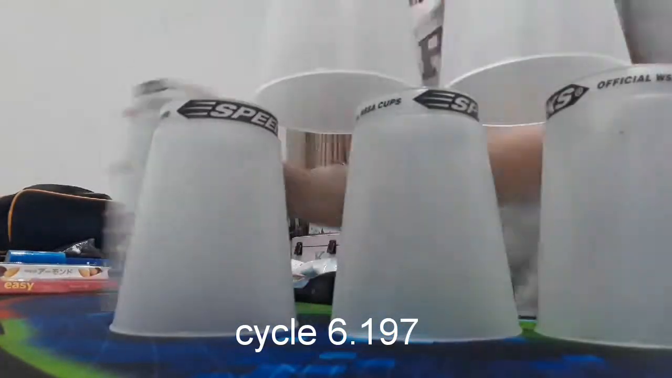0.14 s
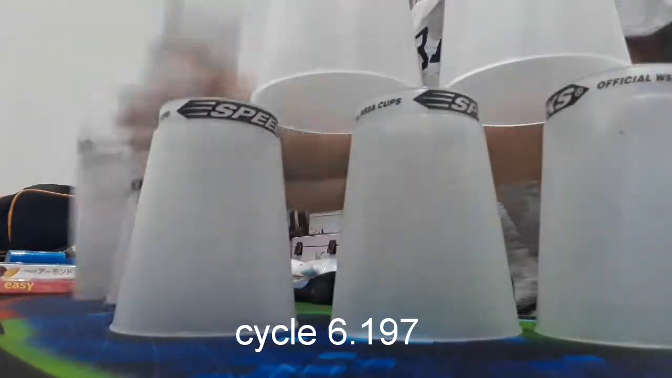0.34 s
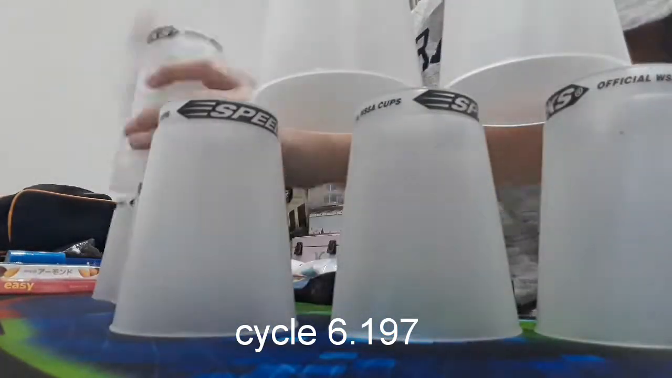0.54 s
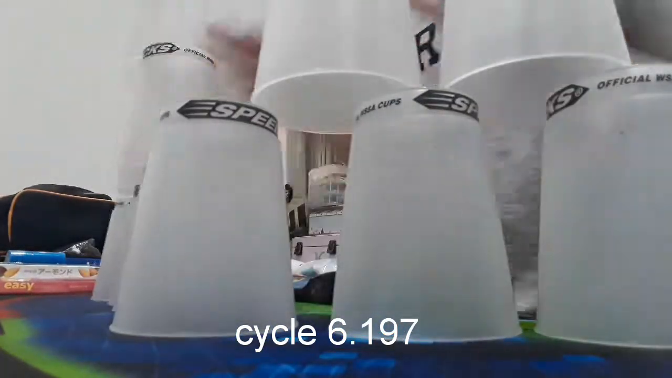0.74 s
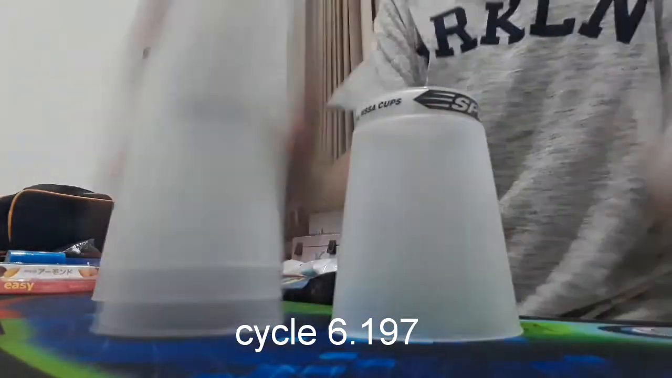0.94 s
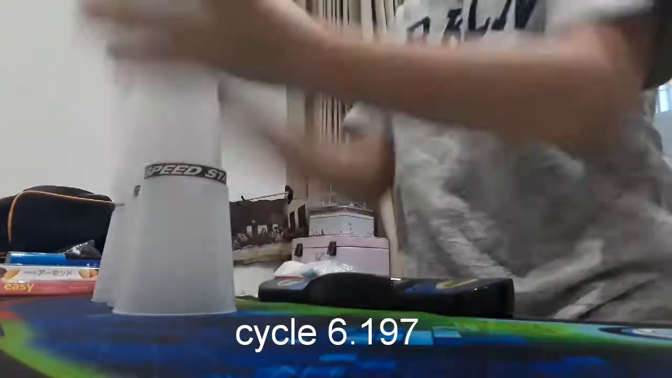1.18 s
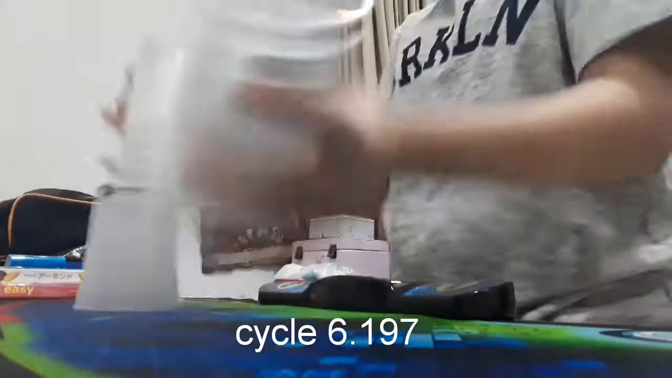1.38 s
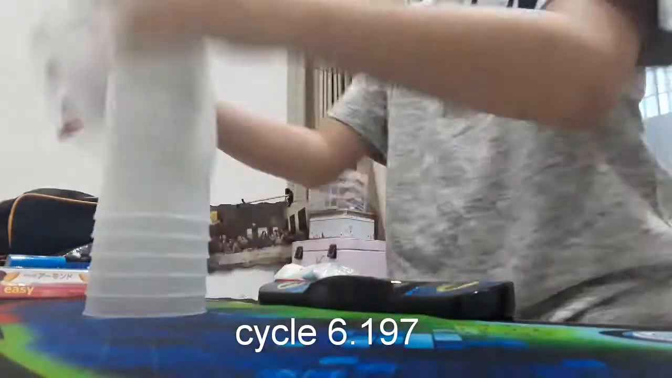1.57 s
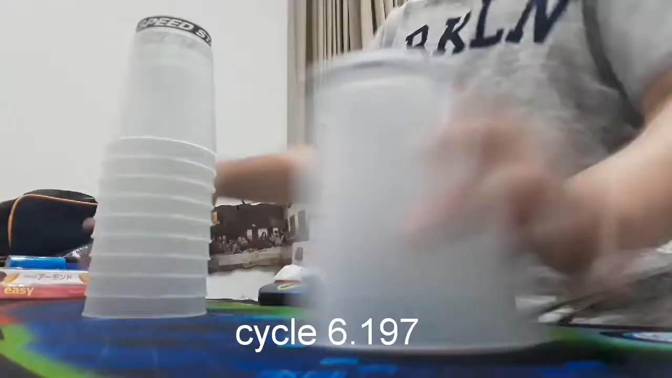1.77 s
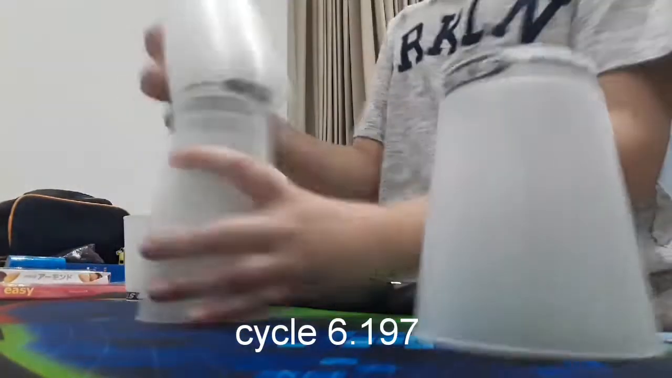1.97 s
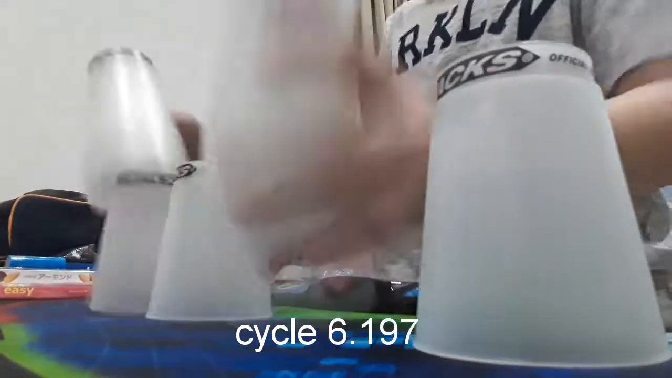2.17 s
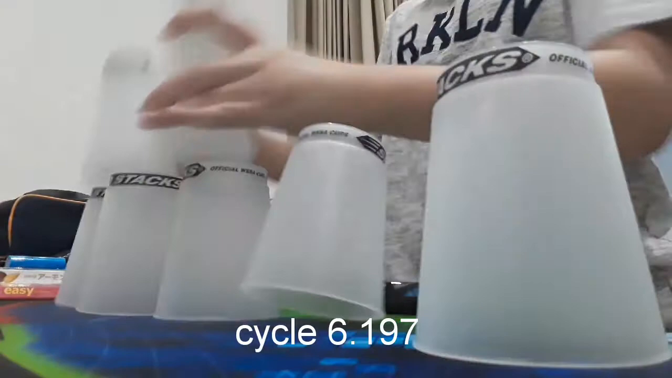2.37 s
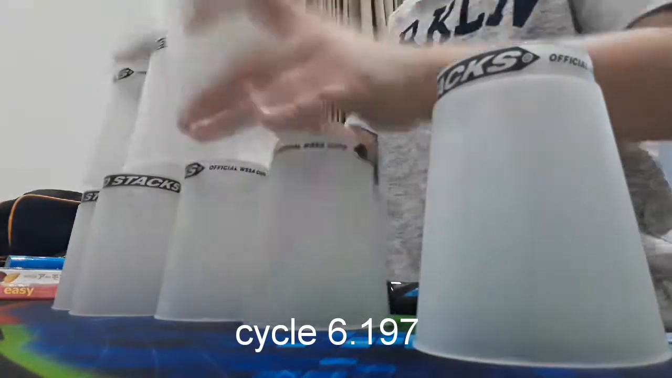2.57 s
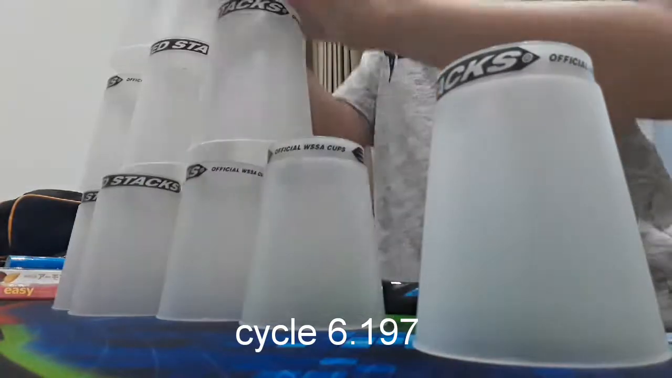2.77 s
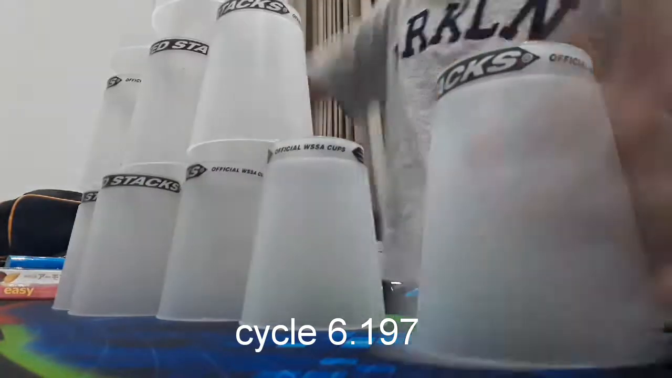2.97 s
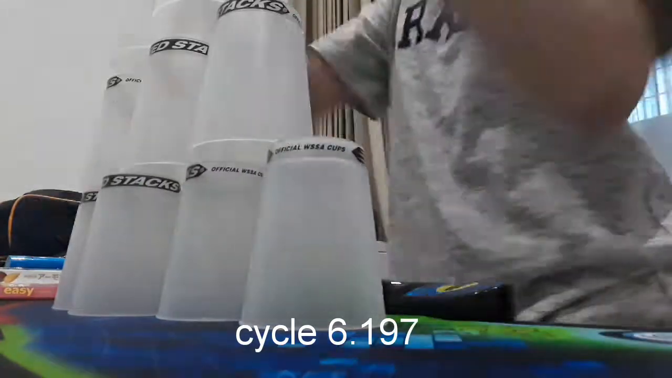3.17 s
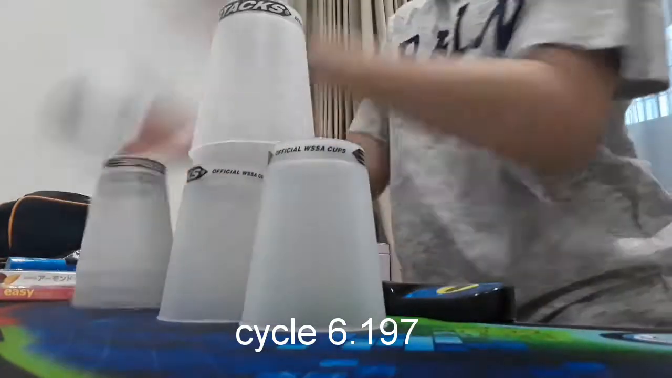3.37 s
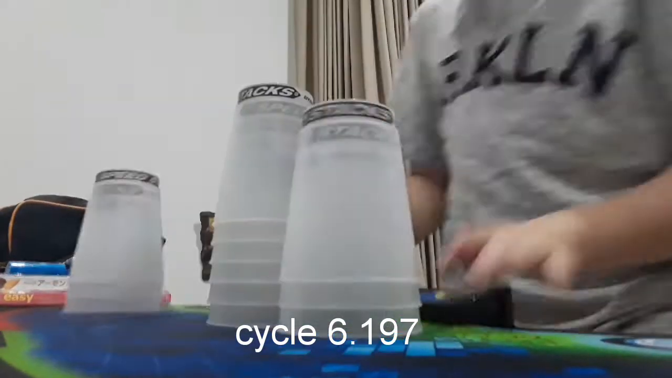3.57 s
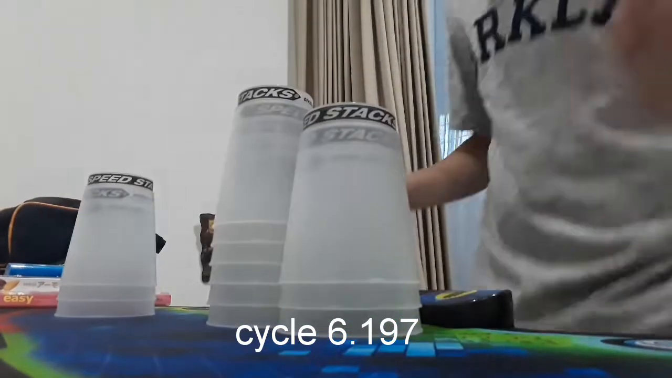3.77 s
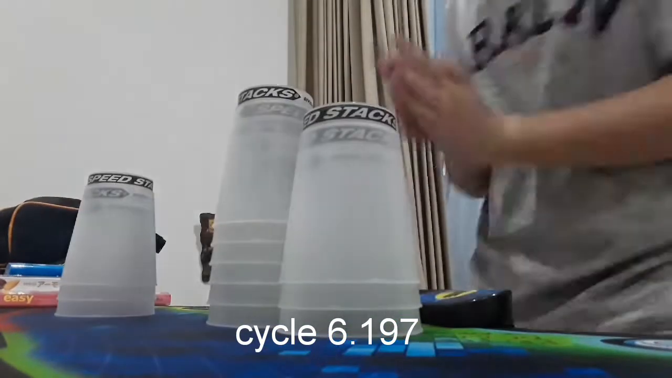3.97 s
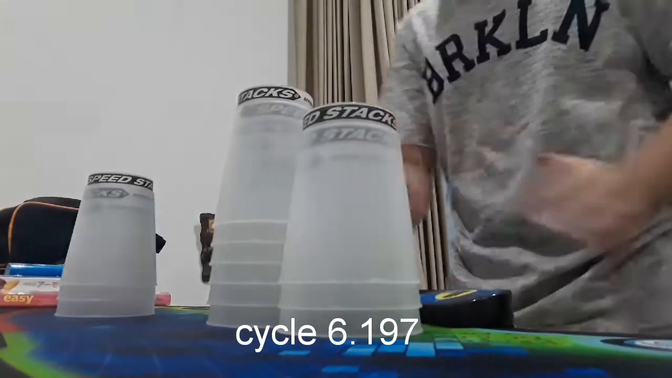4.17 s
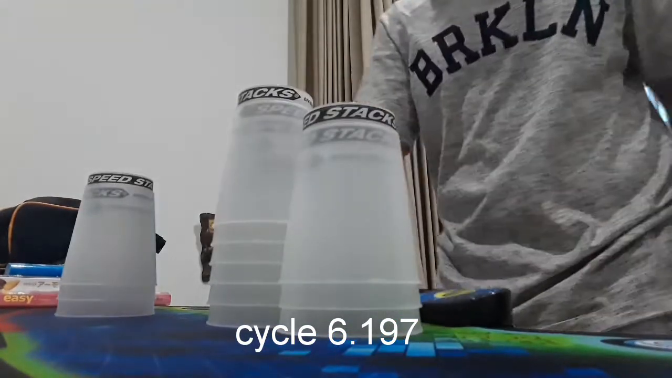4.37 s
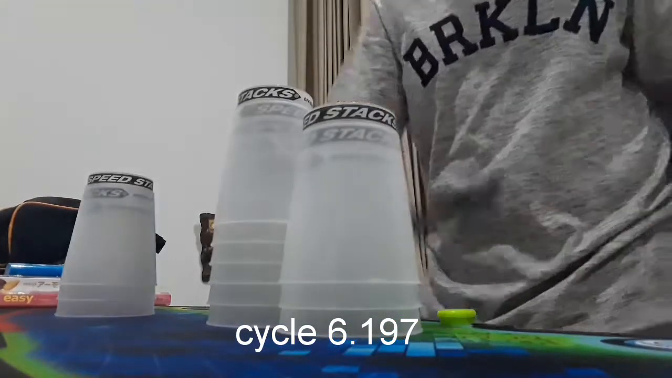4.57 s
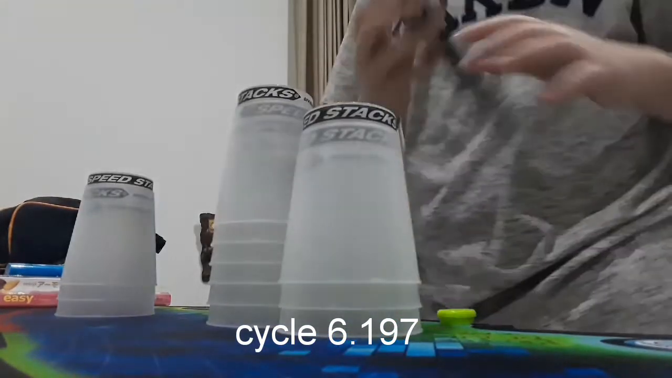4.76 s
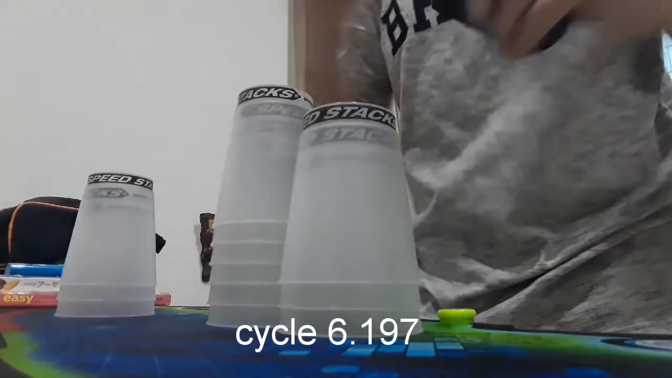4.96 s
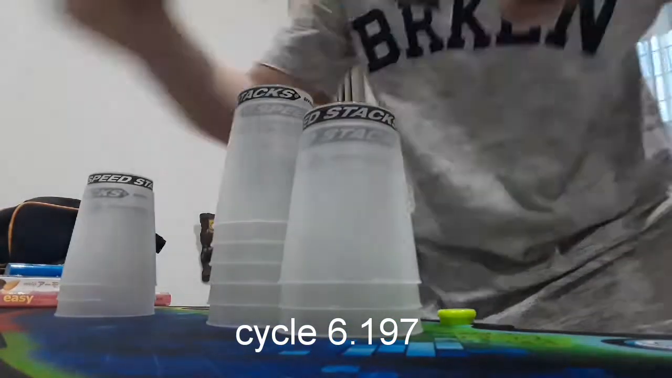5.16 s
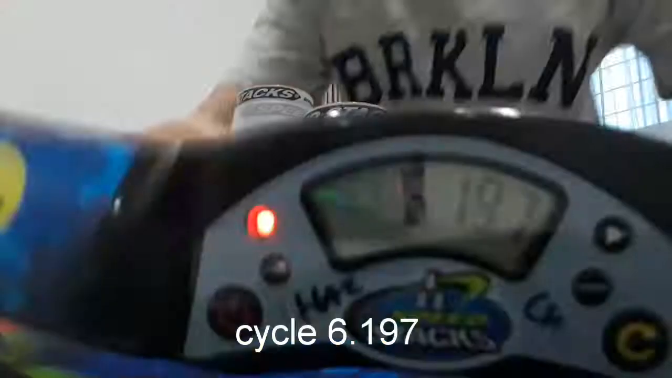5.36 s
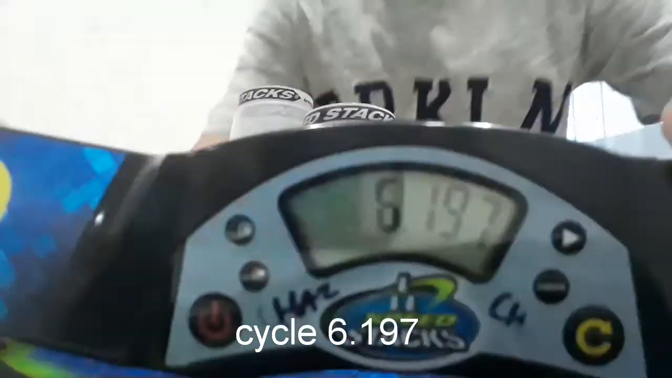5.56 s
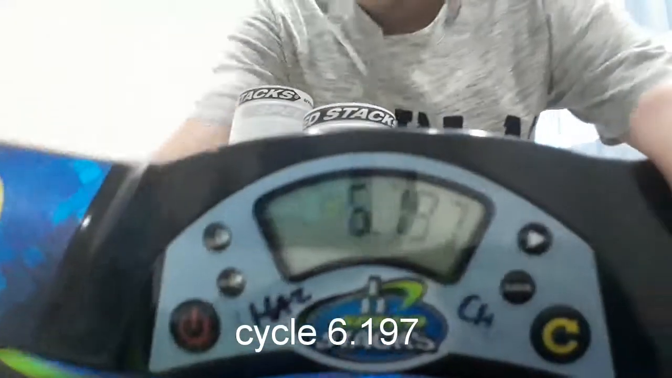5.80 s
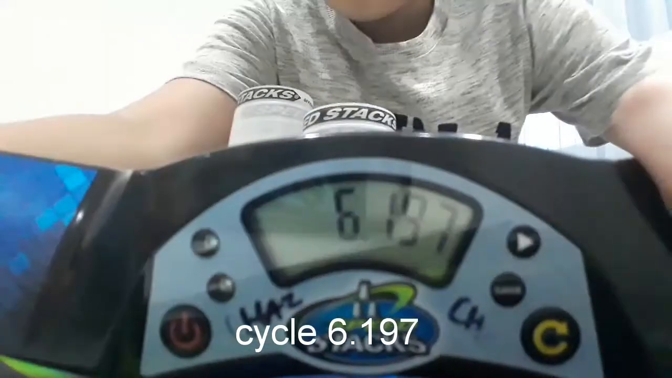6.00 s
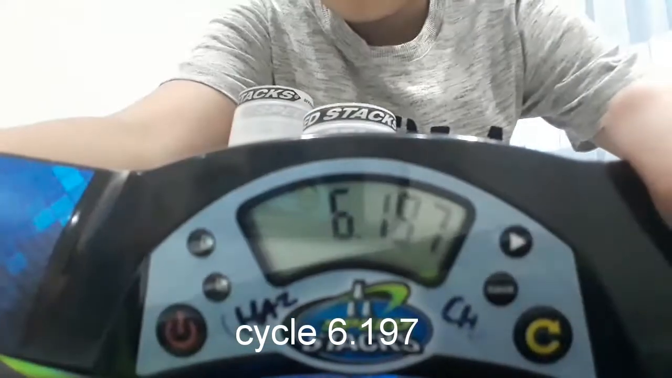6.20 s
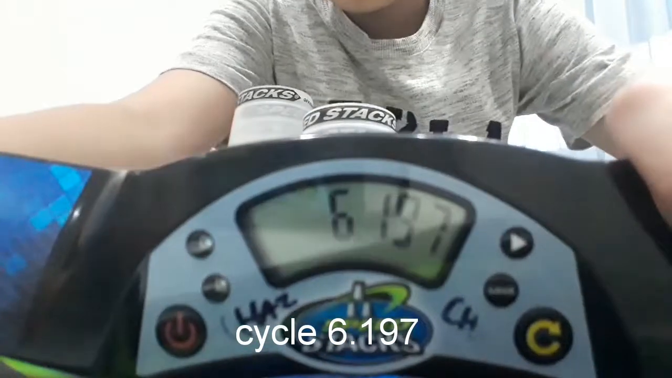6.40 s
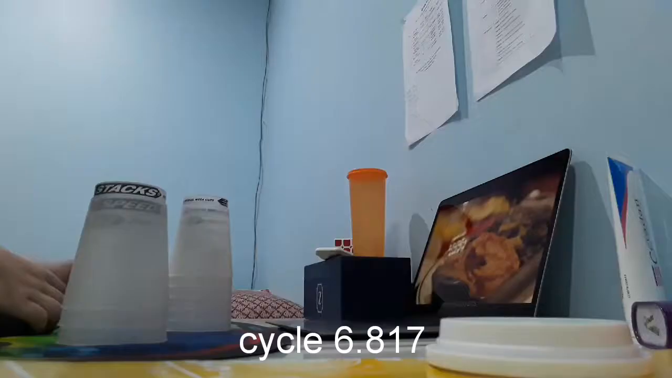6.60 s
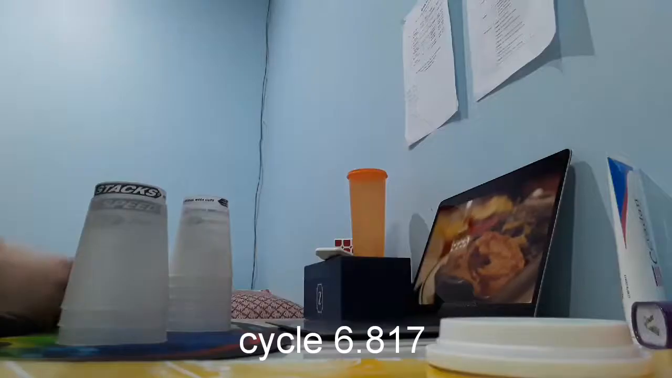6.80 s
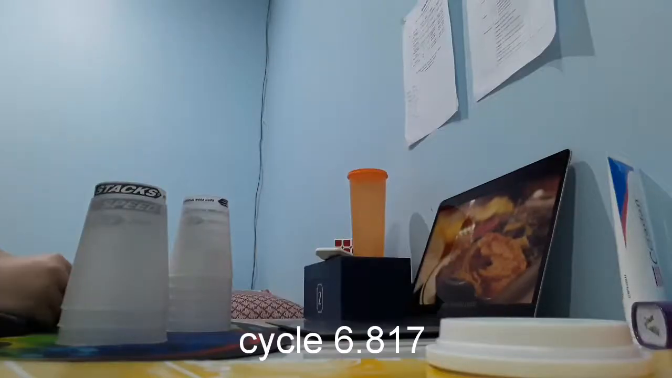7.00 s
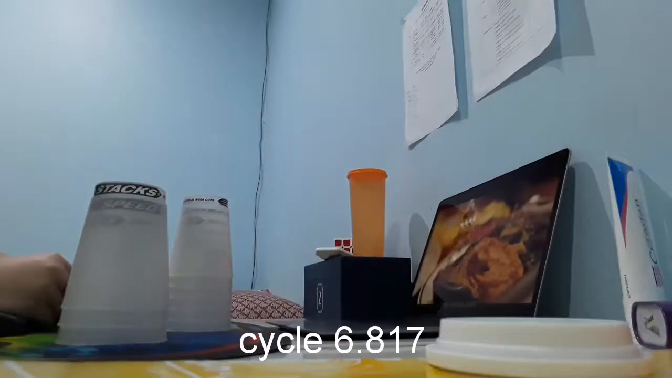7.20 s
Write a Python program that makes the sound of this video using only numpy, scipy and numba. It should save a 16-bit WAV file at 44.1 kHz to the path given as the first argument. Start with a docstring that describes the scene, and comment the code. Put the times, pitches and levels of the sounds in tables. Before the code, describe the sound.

Plastic cups clatter rapidly as they are stacked up and down, followed by one hand clap, a thump and a few more cup knocks.

```python
"""Fast, hollow clatter of plastic cups stacked up and down on a cloth mat, close by in a small hard room. Each
blow rings the air inside a cup, its thin wall and rim, and the table. A hand clap ends the run; a timer is
lifted with the mat and set down. The sound fades out and the scene changes: two cups are struck in another
room."""
import sys
import numpy as np
from scipy import signal
from scipy.fft import rfft, irfft
from scipy.io import wavfile
from scipy.ndimage import uniform_filter1d, minimum_filter1d
from numba import njit

SR = 44100
rng = np.random.default_rng(int(sys.argv[2]) if len(sys.argv) > 2 else 0)


def generate_wav(signal):
    """Clip the signal to [-1, 1] and save it as 16-bit WAV at the path in sys.argv[1]."""
    frames = np.transpose(np.atleast_2d(signal))
    scaled = np.clip(frames, -1, 1) * 32767
    pcm = np.round(scaled).astype(np.int16)
    wavfile.write(sys.argv[1], SR, pcm)


N = 319284

# Room air level after the clap: a swell, then a fade before the scene changes. Each row: time in seconds, level
# in dB.
AIR_LEVELS = [(4.38, -63.5), (4.92, -52.5), (5.15, -52), (5.45, -54.5), (5.74, -55), (6.1, -62.5),
              (6.36, -67), (6.54, -78.5)]
# Room air spectrum. Each row: frequency in Hz, relative density in dB.
AIR_SPECTRUM = [(18, -7.5), (40, -10.5), (87, -16), (275, -8.5), (448, -13), (560, -11), (625, -13.5),
                (1810, -24), (2120, -26), (6000, -42), (7800, -73), (13200, -120)]
# Mat drags. Each row: peak time in seconds, level in dB, rise and fall in dB per second.
MAT_DRAGS = [(5.12, -61.5, 38, 31), (5.66, -64, 30, 70)]
# Room tail. Each row: band centre in Hz, T60 in seconds, weight in dB.
ROOM_BANDS = [(90, 0.48, -25), (180, 0.26, -22), (360, 0.42, -22), (720, 0.14, -19.5), (1333, 0.49, -14),
              (2780, 0.38, -26), (6260, .52, -22), (11100, 0.46, -17)]

# Broad resonances. Each row: centre in Hz, width in Hz, relative level in dB.
MAT_BANDS = [(1230, 610, 0), (2100, 300, 2.5), (2560, 490, 4.5), (4260, 940, -4.5), (6570, 1400, 2.5),
             (8650, 560, 4), (10500, 1500, -2.5), (13000, 3000, -9)]
TIMER_SLIDE_BANDS = [(2100, 200, 2.5), (4100, 350, -6), (5500, 500, -8)]
SECOND_ROOM_BANDS = [(400, 510, 5.5), (990, 180, 4), (2120, 570, 10.5), (4860, 6200, 5), (12300, 8000, 7.5)]
PALM_BANDS = [(630, 1700, -8), (1360, 450, -6.5), (1940, 280, -3), (2840, 820, 0.5), (5320, 2000, -11.5),
              (8150, 2100, -17.5), (12000, 5700, -28.5)]
WALL_BANDS = [(1936, 1700, 1), (2250, 1700, -9), (3190, 590, 0), (4120, 380, -5)]
RIM_BANDS = [(4560, 3300, 1), (5633, 360, 5), (6060, 3300, 5.5), (8490, 1200, 2.5), (10700, 1700, -4),
             (14300, 4100, -9.5)]
STACK_BANDS = [(640, 360, -2), (1250, 140, -16)]

# Table top. Each row: frequency in Hz, relative level in dB, T60 in seconds.
TABLE_MODES = [(94.5, -8, 0.026), (149, -1, .03), (200.6, 10.5, 0.018), (237, 3, 0.0087)]
# Slammed stacks, the timer set down and lighter bumps. Each row: start in seconds, level in dB.
TABLE_THUDS = [(0.217, -19.5), (0.2291, -23.5), (0.239, -22), (0.3237, -16.5), (0.4529, -18), (0.529, -10),
               (1.044, -8.5), (1.0528, -2), (1.053, -6), (1.1633, -14.5), (1.317, -5.5), (1.3198, -4),
               (1.3353, -14), (1.4205, -19.5), (1.6346, -23.5), (1.701, -22), (1.8043, -25),
               (2.0484, -18.5), (2.2262, -21), (2.2927, -26.5), (2.3207, -21), (2.413, -22.5),
               (2.5676, -23.5), (3.053, -29.5), (3.3223, -9.5), (3.3501, -0.5), (3.5155, -17),
               (3.534, -16.5), (3.5459, -4.5), (4.313, -53), (5.4043, -3.5), (5.472, -30), (5.527, -32),
               (5.9, -46.5), (6.028, -38.5), (6.6331, -18.5), (6.8531, -12.5)]
# Idle cups. Each row: start and end of excitation in seconds, pitch in Hz, coupling in dB.
IDLE_CUPS = [(0.06, 0.09, 1300, -58), (2.84, 2.9, 1382, -59), (6.63, 6.66, 994, -54.5)]
# Cups brushing together. Each row: start and end in seconds, ticks per second, cavity level in dB.
RATTLE_SPANS = [(0.274, 0.335, 160, -34), (0.46, 0.901, 19.6, -32), (0.95, 1.065, 70, -29.5),
                (1.069, 1.449, 30, -25.5), (1.444, 1.721, 40, -35.5), (1.95, 2.45, 25, -39),
                (0.144, 0.275, 40, -40), (0.339, 0.446, 30, -42), (2.5, 2.902, 37, -29.5),
                (3.05, 3.108, 110, -50), (3.253, 3.372, 120, -26), (3.52, 3.559, 120, -27),
                (6.81, 6.847, 60, -37)]
# Timer unclipped, carried, set down. Each row: start in seconds, pitch in Hz, body and edge drive in dB.
TIMER_BLOWS = [(4.458, 1230, -40, -53), (4.4712, 815, -39.5, -45), (4.4813, 1420, -38, -40.5),
               (4.5161, 1490, -33.5, -36.5), (4.5538, 1350, -31, -45), (4.6046, 517, -37, -37.5),
               (5.2841, 438, -46, -50), (5.4034, 403, -15, -19.5), (5.4192, 473, -27, -34.5),
               (5.556, 617, -45, -47), (5.577, 401, -39, -48.5), (6.029, 403, -52, -58)]
# Cup on cup or mat. Each row: start in seconds, cavity pitch in Hz, cavity and edge drive in dB.
CUP_BLOWS = [(0.039, 662, -6.5, -22.5), (0.0492, 590, -14.5, -41), (0.068, 1290, -12.5, -21.5),
             (0.0724, 677, -4.5, -19.5), (0.077, 1327, -8, -21), (0.0815, 640, -13.5, -24),
             (0.2846, 720, -23.5, -23.5), (0.3233, 401.4, -20.5, -23), (0.4512, 873, 0, -13.5),
             (0.4661, 794, -11.5, -30), (0.528, 860, 1, -12), (0.6232, 1062, -12, -21),
             (0.6347, 1143, -14, -30), (0.643, 787, -11.5, -23.5), (0.6774, 815, -8, -24.5),
             (0.7215, 687, 0.5, -14), (0.727, 1310, -7.5, -23), (0.734, 617.2, -11, -19),
             (0.9098, 719, -19.5, -38), (0.9351, 599, -16, -31.5), (0.9553, 1248, -14.5, -22),
             (0.9706, 1263, -22, -26.5), (0.9828, 727.5, -11, -16), (0.994, 681, -8.5, -18),
             (0.9985, 725.4, -9, -18.5), (1.007, 840, -12.5, -4), (1.0205, 1180, -18, -11.5),
             (1.0373, 602, -1, -20.5), (1.043, 770, 5, -17), (1.0524, 1292, -7.5, -1),
             (1.0685, 659, -17, -18.5), (1.1215, 605, -4.5, -21.5), (1.1342, 403.3, -27, -22),
             (1.1522, 790, -18.5, -24), (1.1629, 824, -5.5, -12.5), (1.2018, 812, -20.5, -23.5),
             (1.2454, 621, -12, -21), (1.2685, 857, -0.5, -5.5), (1.2863, 659, -5, -13.5),
             (1.2948, 788, -10, -9.5), (1.3198, 754, -2.5, -6.5), (1.3366, 743, -8, -18),
             (1.3623, 1050, -21, -15), (1.3737, 1033, -16, -25.5), (1.405, 950, -24, -24),
             (1.4208, 820, -9, -12), (1.5069, 1032, -36, -28), (1.559, 577, -14.5, -26),
             (1.5869, 879, -23, -22), (1.6352, 840, -12.5, -20.5), (1.7013, 1117, -15, -24),
             (1.8043, 844, -20.5, -53), (1.8404, 722, -4, -25.5), (1.8618, 680, -11.5, -31.5),
             (2.0361, 540, -25, -33), (2.0482, 441, -17, -30), (2.1336, 950, -23, -22.5),
             (2.2261, 733, -7, -21), (2.2936, 795, -34, -29.5), (2.3021, 727, -8, -19.5),
             (2.3227, 797, -39.5, -31.5), (2.4041, 770, -10.5, -36.5), (2.4117, 393, -18, -21),
             (2.4609, 722, -2.5, -19.5), (2.4874, 793, -18.5, -27.5), (2.5069, 644, -18, -29),
             (2.5375, 746, -13, -29), (2.5677, 1049, -9, -23.5), (2.5987, 573, -12.5, -24.5),
             (2.6273, 690, -13.5, -33.5), (2.6558, 675, 0, -15.5), (2.7013, 1016, -11, -28.5),
             (2.7222, 560, -15, -28), (2.7549, 641, -11.5, -16), (2.7671, 610, -21.5, -26),
             (2.7748, 610, -9, -28), (2.7997, 692, -15, -27.5), (2.8272, 778, -13, -37.5),
             (2.8449, 562, -13.5, -34), (2.8646, 894, -4, -21.5), (2.87, 1315, -8, -17.5),
             (2.8773, 555.6, -9.5, -25.5), (2.9785, 1345, -27, -49), (3.2568, 1177, -20.5, -23),
             (3.2608, 781, -4.5, -16), (3.2757, 472, -9.5, -10), (3.2849, 950, 1.5, -1),
             (3.296, 1252, -3, -6), (3.3074, 1303, -4, -6.5), (3.3227, 1238, 2, -10),
             (3.334, 666.4, -4.5, -14), (3.3391, 636, -1, -15), (3.3495, 383, -2.5, -4.5),
             (3.3625, 517, -7, -18.5), (3.3673, 1605, -11.5, -10), (3.4491, 1030, -13, -18.5),
             (3.4908, 778, -3, -16.5), (3.4985, 626, -16, -19.5), (3.5158, 553, -6, -14.5),
             (3.5225, 670, -1.5, -6.5), (3.5295, 622, -7.5, -10.5), (3.535, 606, 6.5, -12),
             (3.5464, 680, -5, -15.5), (3.5541, 688, -2.5, -5), (6.6205, 730, -27, -40),
             (6.6325, 954, -15.5, -10.5), (6.645, 978, -14.5, -28), (6.8056, 424, -23.5, -33.5),
             (6.8515, 524, -4, -15)]

CLAP_S, TIMER_SLIDE_S, SECOND_ROOM_S = 3.9475, 5.58, 6.62
AIR_BEFORE_CLAP_DB, SECOND_ROOM_AIR_DB = -55.5, -62.5
HUM_HZ, HUM_OFFSET_DB = 100, -9.5
ECHO_S, ECHO_DB = 0.0128, -19
MAT_PLACES = 3
RATTLE_HZ, RATTLE_EDGE_DB, RATTLE_SCATTER_DB = 800, -1.5, 3
SHELL_HZ, SHELL_T60_S = 1319.6, 0.024
CHATTER_PEAK_S, CHATTER_GROWTH_PER_DB = 0.0015, 0.0082  # peak time for edge drive 11 dB under cavity
THUD_RE_CAVITY_DB = -22.5
BASS_CUT_HZ, SHELF_HZ, SHELF_DB, TOP_HZ = 100, 15800, -11.5, 16900
LIMIT_DB, RELEASE_S, AHEAD_S = -0.8, 0.03, 0.003


def undb(db):
    return 10 ** (np.asarray(db) / 20)


def unit_rms(x):
    return x / np.sqrt(np.mean(x ** 2))


def add(out, start_s, sound):
    i = int(start_s * SR)
    sound = sound[:len(out) - i]
    out[i:i + len(sound)] += sound


def envelope(t, t60_s, rise_s):
    """Exponential rise and decay, peak 1."""
    shape = (1 - np.exp(-t / rise_s)) * np.exp(-np.log(1000) * t / t60_s)
    return shape / shape.max()


def spectrum(bands):
    """Gain against Hz of a set of broad resonances."""
    return lambda hz: np.sqrt(sum(undb(2 * db) / (1 + (2 * (hz - centre_hz) / width_hz) ** 4)
                                  for centre_hz, width_hz, db in bands))


def noise(colour, count):
    """Noise with spectrum colour(Hz), rms 1."""
    hz = np.fft.rfftfreq(count, 1 / SR) + 1
    return unit_rms(irfft(rfft(rng.standard_normal(count)) * colour(hz), count))


def flicker(depth_db, samples):
    """Random gain, smoothed over the given samples."""
    return undb(depth_db * unit_rms(uniform_filter1d(rng.standard_normal(N), samples)))


def click(bands):
    """One tick with the smooth spectrum of the bands, energy 1."""
    tick = np.roll(irfft(spectrum(bands)(np.fft.rfftfreq(512, 1 / SR))), 256)
    return tick / np.linalg.norm(tick)


def ring(t, modes, draws, rise_s, scatter_db, glide=0.):
    """Struck modes, peak 1. The strike point sets their shares, the grip detunes them."""
    hz, db, t60_s = np.array(modes).T
    hz = hz * (1 + 0.063 * draws[:len(hz)])
    gains = undb(db + scatter_db * draws[-len(hz):])
    bent_s = t * (1 + glide * np.exp(-t / 0.00075))
    out = sum(gain * envelope(t, decay_s, rise_s) * np.sin(2 * np.pi * f * bent_s)
              for f, gain, decay_s in zip(hz, gains, t60_s))
    return out / np.abs(out).max()


def room_air(t):
    """Low air noise and a wavering mains hum."""
    contour_db = np.interp(t, *np.transpose(AIR_LEVELS))
    air_db = np.select([t < CLAP_S, t > SECOND_ROOM_S], [AIR_BEFORE_CLAP_DB, SECOND_ROOM_AIR_DB],
                       contour_db)
    hz, db = np.transpose(AIR_SPECTRUM)
    air = noise(lambda f: undb(np.interp(np.log(f), np.log(hz), db)), N)
    waver = 0.44 * noise(spectrum([(HUM_HZ, 25, 0)]), N)
    hum = unit_rms(np.sin(2 * np.pi * HUM_HZ * t) + waver)
    return undb(air_db) * air + undb(contour_db + HUM_OFFSET_DB) * hum


def mat_drag(t):
    """Cloth dragged over the table; its fibres catch unevenly."""
    level = sum(undb(db - np.where(t < peak_s, rise * (peak_s - t), fall * (t - peak_s)))
                for peak_s, db, rise, fall in MAT_DRAGS)
    return level * flicker(depth_db=1.3, samples=600) * noise(spectrum(MAT_BANDS), N)


def timer_slide(t):
    """Faint friction of the timer's shell."""
    return undb(-62) * envelope(t, t60_s=0.58, rise_s=0.066) * noise(spectrum(TIMER_SLIDE_BANDS), len(t))


def background():
    """Air, hum and friction, muted briefly before the second room."""
    t = np.arange(N) / SR
    out = room_air(t) + mat_drag(t)
    add(out, TIMER_SLIDE_S, timer_slide(t[:SR // 2]))
    mute_s = AIR_LEVELS[-1][0]
    return out * ((t < mute_s) | (t > SECOND_ROOM_S))


def room(x):
    """Diffuse tail, decaying octave by octave."""
    t = np.arange(int(0.7 * SR)) / SR
    tail = 0
    for hz, t60_s, db in ROOM_BANDS:
        band = noise(spectrum([(hz, 1.2 * hz, 0)]), len(t))
        tail += undb(db - 71.5) * np.sqrt(hz / t60_s) * envelope(t, t60_s, rise_s=0.002) * band
    return signal.fftconvolve(x, tail)[:N]


def second_room(wet):
    """Reflections turn louder and brighter after SECOND_ROOM_S."""
    late = wet * (np.arange(N) > SECOND_ROOM_S * SR)
    colour = spectrum(SECOND_ROOM_BANDS)(np.fft.rfftfreq(N, 1 / SR))
    return wet - late + irfft(rfft(late) * colour, N)


def opening_tail():
    """Room tail of a blow 30 ms before the start."""
    blow = np.zeros(N)
    add(blow, 0, undb(7) * (click(STACK_BANDS) + 0.16 * click(WALL_BANDS) + 0.1 * click(RIM_BANDS)))
    return room(blow)[int(0.03 * SR):]


def idle_cups(x):
    """Standing cups pick up nearby blows and ring on."""
    t, scene_s = np.arange(int(0.7 * SR)) / SR, np.arange(N) / SR
    out = np.zeros(N)
    for start_s, end_s, hz, db in IDLE_CUPS:
        band = noise(spectrum([(hz, 170, 0)]), len(t))
        response = undb(db) * envelope(t, t60_s=0.5, rise_s=0.012) * band
        out += signal.oaconvolve(x * (scene_s > start_s) * (scene_s < end_s), response)[:N]
    return out


def table_thuds():
    """Low thuds of the table top, from slammed stacks, the timer set down and lighter bumps."""
    out, t = np.zeros(N), np.arange(int(0.09 * SR)) / SR
    for start_s, db in TABLE_THUDS:
        thud = ring(t, TABLE_MODES, rng.standard_normal(8), rise_s=0.011, scatter_db=0.61)
        add(out, start_s, undb(db) * thud)
    return out


def clap():
    """Air squeezed from between the palms. Returns direct sound and room send."""
    direct, send, t = np.zeros(N), np.zeros(N), np.arange(int(0.013 * SR)) / SR
    burst = undb(-1.5) * envelope(t, t60_s=0.011, rise_s=0.0021)
    add(direct, CLAP_S, burst * noise(spectrum(PALM_BANDS), len(t)))
    add(send, CLAP_S, np.linalg.norm(burst) * click(PALM_BANDS))
    return direct, send


def rattle():
    """Light random ticks of cups sliding together, as rows like CUP_BLOWS."""
    rows = []
    for start_s, end_s, per_s, db in RATTLE_SPANS:
        span_s = end_s - start_s
        for when, pitch, cavity, edge in rng.random((30, 4))[:int(span_s * per_s) + 1]:
            cavity_db = db + RATTLE_SCATTER_DB * (2 * cavity - 1)
            edge_db = db + RATTLE_EDGE_DB + RATTLE_SCATTER_DB * (2 * edge - 1)
            rows.append((start_s + when * span_s, RATTLE_HZ * 2 ** (pitch - 0.5), cavity_db, edge_db))
    return rows


def plastic_blows(rows, t60_s, rim_offset_db, shell_db):
    """Cavity ring, edge chatter and table thud. Returns direct sound, thuds and a room send per place."""
    out, t = np.zeros((2 + MAT_PLACES, N)), np.arange(int(0.09 * SR)) / SR
    direct, thuds, *sends = out
    blow_draws = rng.standard_normal((300, 19))
    chatter = flicker(depth_db=3, samples=35)  # edges touch several times
    wall = chatter * noise(spectrum(WALL_BANDS), N)
    rim = chatter * noise(spectrum(RIM_BANDS), N)
    for k, ((start_s, hz, cavity_db, edge_db), draws) in enumerate(zip(rows, blow_draws)):
        # neighbouring cups answer lower and higher; the closing gap bends the pitch
        modes = [(hz, 0, t60_s), (0.72 * hz, -7, t60_s), (1.399 * hz, -7, 0.8 * t60_s),
                 (1.5 * hz, -13, t60_s), (SHELL_HZ, shell_db, SHELL_T60_S)]
        cavity = ring(t, modes, draws[:10], rise_s=0.0017, scatter_db=2.9, glide=0.14 * draws[0])
        cavity *= undb(cavity_db)

        peak_s = CHATTER_PEAK_S * np.exp(CHATTER_GROWTH_PER_DB * (edge_db - cavity_db + 11))
        contact = t / peak_s * np.exp(1 - t / peak_s)
        wall_gain, rim_gain = undb(edge_db - 5), undb(edge_db + rim_offset_db + draws[-1])
        i = int(start_s * SR / 2)
        edges = contact * (wall_gain * wall[i:i + len(t)] + rim_gain * rim[i:i + len(t)])
        add(direct, start_s - 0.0008, cavity + edges)

        thud = ring(t, TABLE_MODES, draws[10:-1], rise_s=0.0083, scatter_db=3)
        add(thuds, start_s, undb(cavity_db + THUD_RE_CAVITY_DB) * thud)

        # summed over all directions the spectrum is smoother and the whole stack joins in
        stack = np.linalg.norm(cavity) * click([(hz, 0.5 * hz, 0), *STACK_BANDS])
        tick = np.linalg.norm(contact) * (wall_gain * click(WALL_BANDS) + rim_gain * click(RIM_BANDS))
        add(sends[k % MAT_PLACES], start_s, 0.58 * cavity)
        add(sends[k % MAT_PLACES], start_s, 0.66 * stack + tick)
    return out


def scene():
    """Cups, timer and clap with their reflections, over the background; mono."""
    cups = plastic_blows(CUP_BLOWS + rattle(), t60_s=0.022, rim_offset_db=-7, shell_db=-13)
    timer = plastic_blows(TIMER_BLOWS, t60_s=0.019, rim_offset_db=-8, shell_db=-18)
    direct, thuds, *sends = cups + timer
    clap_direct, clap_send = clap()
    direct += clap_direct
    thuds += table_thuds()
    wet = sum(room(send) for send in sends) + room(clap_send)
    wet += undb(-1) * room(thuds)  # thuds travel mostly through the table
    add(wet, 0, opening_tail())
    wet += undb(ECHO_DB) * np.roll(direct, int(ECHO_S * SR))  # near wall
    return (direct + thuds + second_room(wet) + idle_cups(sum(sends)) + background())[None]


@njit
def limiter_release(ceiling, rate):
    """Gain drops at once and creeps back."""
    out, gain = np.empty(len(ceiling)), 1.
    for i in range(len(ceiling)):
        gain = min(ceiling[i], gain + rate * (1 - gain))
        out[i] = gain
    return out


def record(dry):
    """The microphone drops deep bass and top; a look-ahead limiter ducks the loudest blows."""
    x = signal.sosfilt(signal.butter(2, BASS_CUT_HZ, "high", fs=SR, output="sos"), dry)
    shelf_ramp = np.clip((np.fft.rfftfreq(N, 1 / SR) - SHELF_HZ) / 300 + 0.5, 0, 1)
    x = irfft(rfft(x) * undb(SHELF_DB * shelf_ramp), N)
    ahead = int(AHEAD_S * SR)
    ceiling = np.minimum(1, undb(LIMIT_DB) / (np.abs(x[0]) + 1e-9))
    gain = limiter_release(minimum_filter1d(ceiling, size=2 * ahead + 1), 1 / (RELEASE_S * SR))
    limited = x * uniform_filter1d(gain, size=ahead)
    return signal.sosfilt(signal.ellip(12, 0.2, 90, TOP_HZ, fs=SR, output="sos"), limited)


dry = scene()
out = record(dry)
generate_wav(out)
```